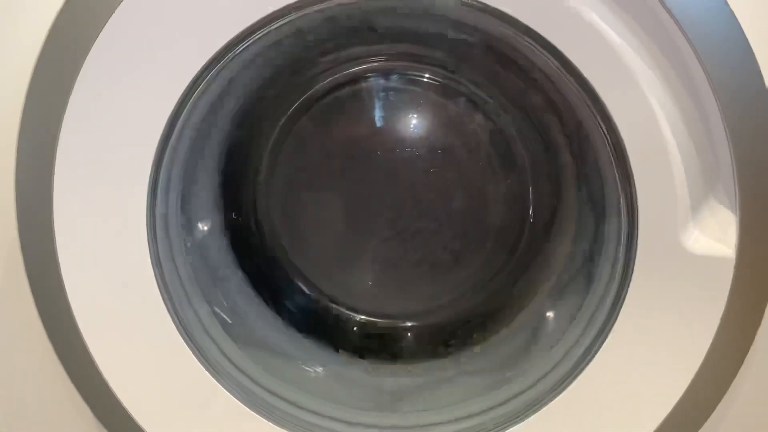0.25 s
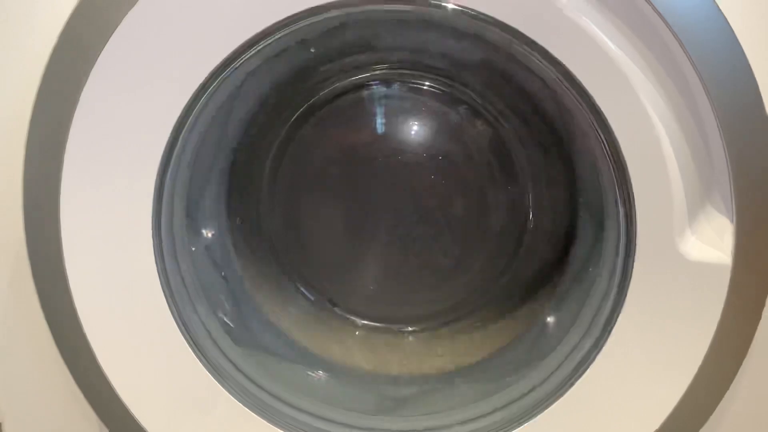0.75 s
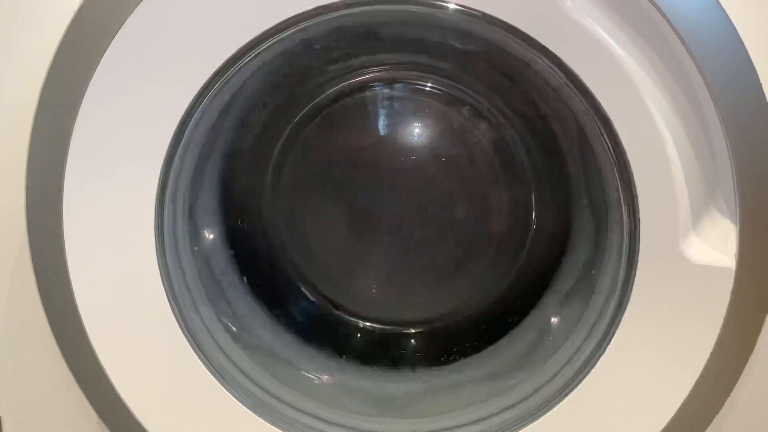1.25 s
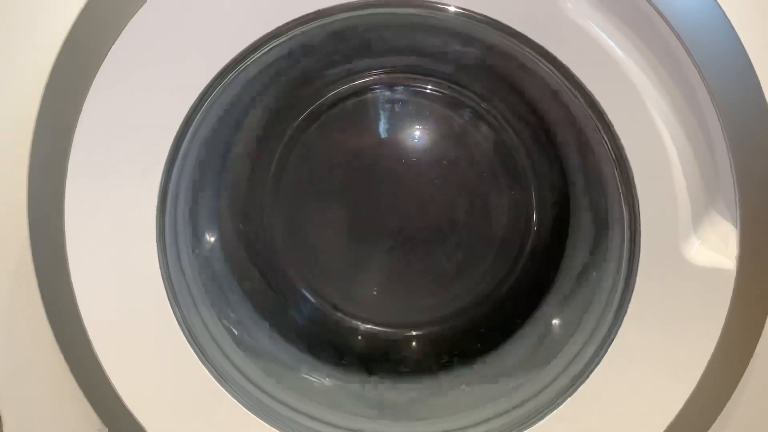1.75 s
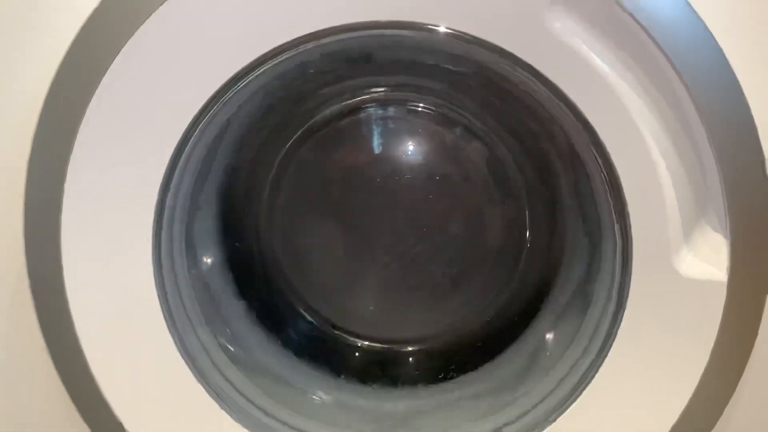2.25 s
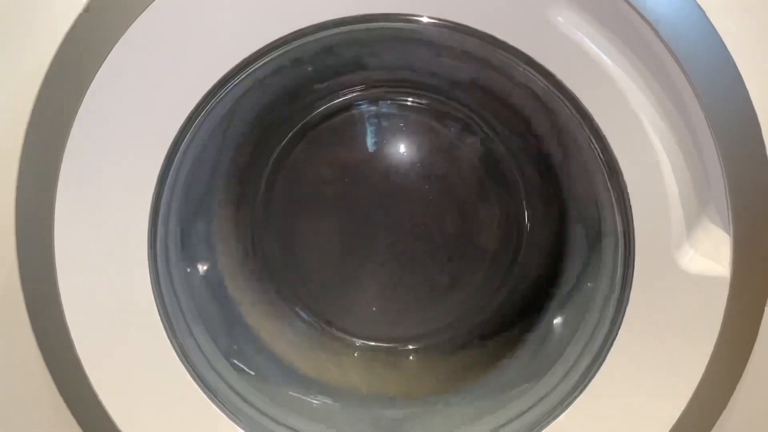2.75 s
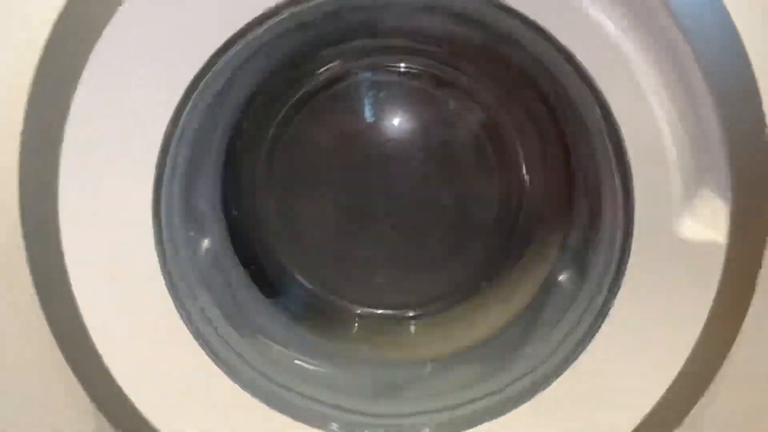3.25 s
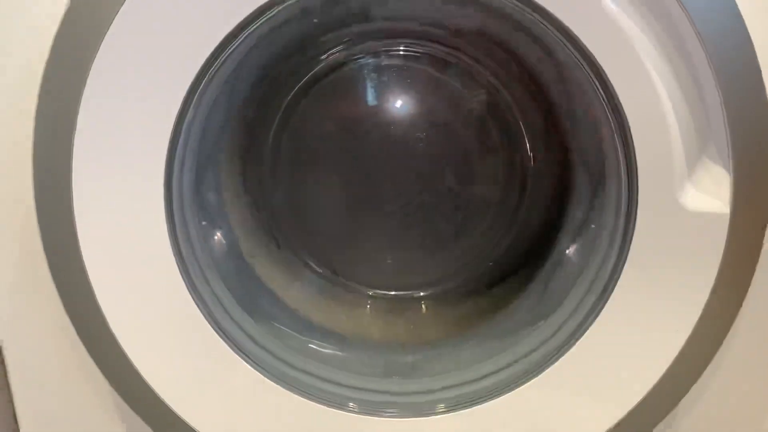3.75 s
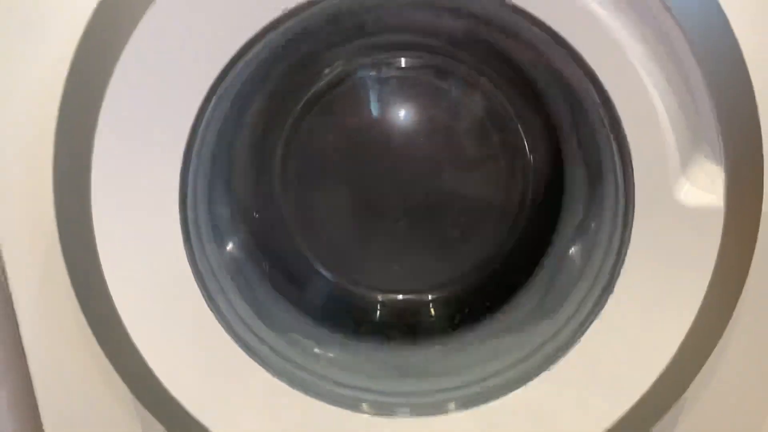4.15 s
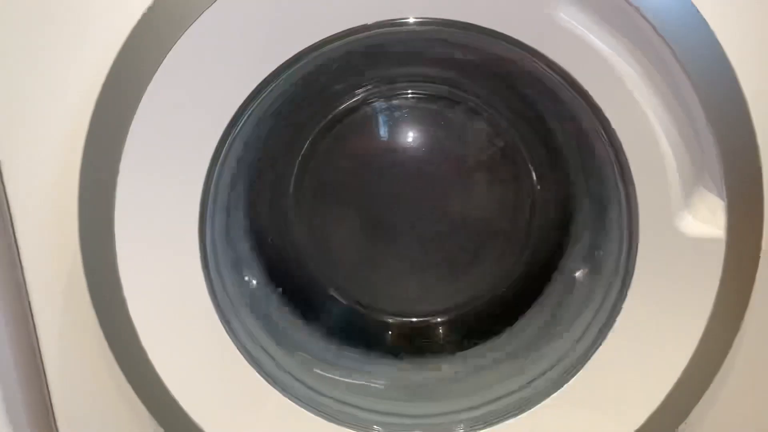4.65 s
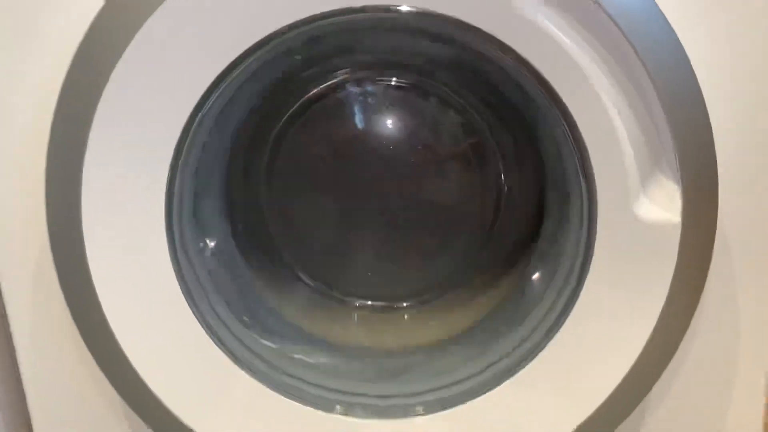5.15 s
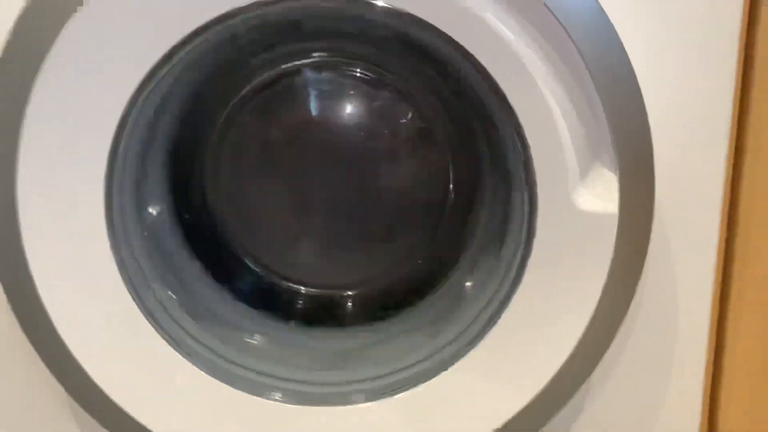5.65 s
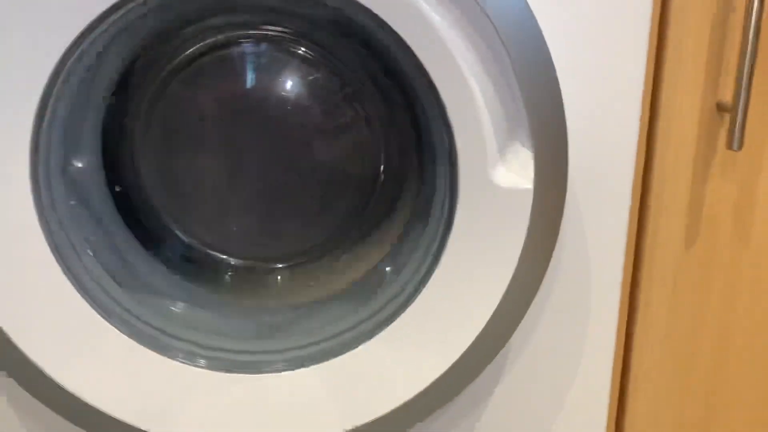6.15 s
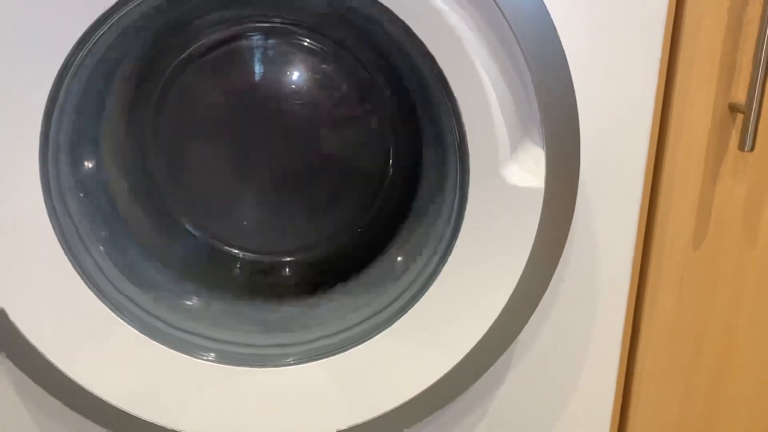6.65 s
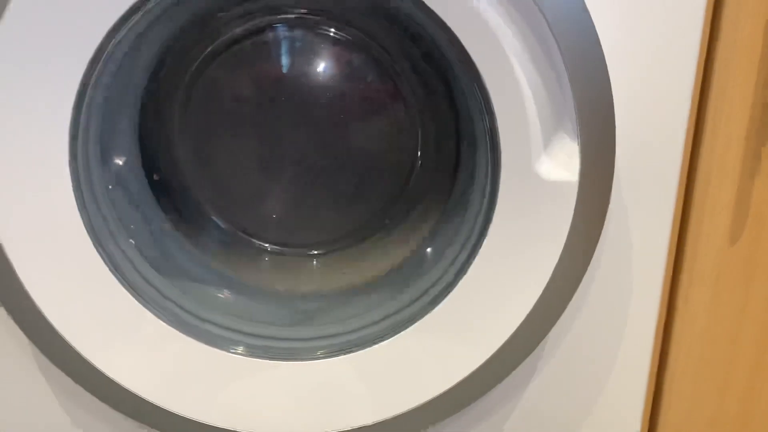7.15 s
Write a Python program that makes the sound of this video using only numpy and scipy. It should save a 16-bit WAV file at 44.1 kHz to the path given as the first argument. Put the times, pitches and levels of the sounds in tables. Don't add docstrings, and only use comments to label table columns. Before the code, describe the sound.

A front-loading washing machine spins fast with a low, slightly rising drone, rapid soft knocking and airy hiss, then one short metallic twang.

```python
import sys
import numpy as np
from scipy import signal
from scipy.fft import rfft, irfft
from scipy.io import wavfile
from scipy.ndimage import uniform_filter1d

SR = 44100
rng = np.random.default_rng(int(sys.argv[2]) if len(sys.argv) > 2 else 0)


def gain_from_db(level_db):
    decades = np.asarray(level_db, float) / 20
    return 10 ** decades


def dump(signal):
    limited = np.clip(np.atleast_2d(signal).T, -1, 1)
    pcm = np.round(limited * 32767).astype(np.int16)
    wavfile.write(sys.argv[1], SR, pcm)


N = 326340
T = np.arange(N) / SR
HZ = np.fft.rfftfreq(N, 1 / SR)
COARSE = 8
EARS = np.array([[1], [-1]])


def curve(table):
    s, *columns = np.transpose(table)
    return [np.interp(T, s, c) for c in columns]


def over_hz(table):
    hz, value = np.transpose(table)
    return np.interp(np.log(HZ + 1), np.log(hz), value)


def unit(x):
    return x / np.sqrt(np.mean(x ** 2))


def walk(rate_hz):
    hold = int(SR / COARSE / rate_hz)
    held = np.repeat(rng.standard_normal(N // COARSE // hold + 2), hold)
    smooth = uniform_filter1d(uniform_filter1d(held, hold), hold)
    return 1.3 * smooth[:len(T[::COARSE])]


def ring(hz, t60, start=0., size=SR // 2):
    t = T[:size]
    return np.sin(2 * np.pi * hz * t + start) * gain_from_db(-60 * t / t60)


# (frequency [Hz], likeness [0-1])
PORT_LIKENESS = [(60, 0.7), (200, 1), (400, 0.5), (700, 0.36), (1300, 0.39), (3000, 0), (5000, 0),
                 (6500, 0.43), (8500, 1), (11000, 0.7), (13300, 1), (15500, .9)]


def ports():
    lag_s, twist_rad = 9.1 / 44100, -1.7
    one, other = rfft(rng.standard_normal((2, N)))
    alike = np.clip(over_hz(PORT_LIKENESS), 0, 1)
    lead = 2 * np.pi * HZ * lag_s + twist_rad * np.clip(HZ / 6000, 0, 1) ** 2
    shared = alike * np.exp(1j * lead) * one
    return np.array([one, shared + np.sqrt(1 - alike ** 2) * other])


# (multiple of turn rate, level close [dB], level backed off [dB])
PANEL_MULTIPLES = [(2, -54.1, -55.5), (3, -39.3, -38.4), (4, -44.8, -43.2), (5, -37.9, -39.3),
                   (6, -28.9, -28.8), (7, -24.1, -22.4), (8, -40.9, -40.9), (9, -37.3, -42.8),
                   (10, -44.4, -44.7), (11, -46.6, -45.1), (12, -43.6, -42.1), (13, -41.3, -42.0),
                   (14, -50.4, -50.1), (15, -37.6, -39.8), (16, -47.1, -42.0), (17, -41.8, -42.1),
                   (18, -43.2, -44.9), (19, -47.6, -48.6), (20, -49.7, -45.0), (22, -46.8, -53.1),
                   (25, -53.6, -48.0), (27, -54.7, -49.4), (29, -54.2, -47.3), (33, -52.7, -56.1),
                   (34, -50.7, -55.5)]
IN_STEP_MULTIPLES = (6, 7, 11, 18)


def cabinet(turn, away):
    turn, away = turn[::COARSE], away[::COARSE]
    out = np.zeros((2, len(turn)))
    panels = {k: (close_db, far_db) for k, close_db, far_db in PANEL_MULTIPLES}
    multiples = range(2, 44 + 1)
    chance = rng.standard_normal((len(multiples), 3))
    for k, (pan, skew, loose) in zip(multiples, chance):
        faint_db = -54.5 - .32 * (k - 21) + 2.5 * np.array([skew, loose])
        close_db, far_db = panels.get(k, faint_db)
        spread = np.clip((k - 7) / 5, .07, 1)

        sweep = (k - 7) * (1.3 - .1 * (k - 6))
        sweep += np.sin(2 * np.pi * k / 3 + 3) * (k != 8)
        sweep += 3 * loose * (k > 19)
        phase = 2 * np.pi * k * turn + sweep * (k not in IN_STEP_MULTIPLES) + .2 * spread * walk(1.5)

        db = close_db + away * (far_db - close_db) + 1.2 * spread * walk(1.2)
        db += 11 * away * (1 - away) * (k == 5 or 8 <= k <= 12)
        db += 1.2 * away * (13 <= k <= 17)
        for ear, sign in enumerate((1, -1)):
            ear_db = db + 3 + sign * (.3 + spread * (.5 + .9 * pan))
            out[ear] += gain_from_db(ear_db) * np.cos(phase + sign * .2 * spread * skew)
    return signal.resample_poly(out, COARSE, 1, axis=1)[:, :N]


# (frequency [Hz], level [dB], t60 [s])
PULLEY_MODES = [(667, -9, .3), (712, -10, .25), (752, -15, .15)]


def belt(turn, lap, away):
    at = np.flatnonzero(np.diff(np.floor(lap)))
    chance = rng.standard_normal((len(at), 3)).T
    size = gain_from_db(1.2 * chance[0] + 1.2 * np.cos(2 * np.pi * turn[at] - 2.4))
    push = np.zeros((2, N + SR))
    for ear, sign in enumerate((1, -1)):
        late = (14 * chance[1] + 5 * sign * chance[2]).astype(int)
        push[ear, at + late] = size

    lead_s = .015
    t = T[:SR // 2] - lead_s
    blip = np.exp(-(t / 0.0096) ** 2) * np.sin(2 * np.pi * t * (700 + 2500 * t))
    after = sum(gain_from_db(db) * ring(hz, t60) for hz, db, t60 in PULLEY_MODES)
    after = after * np.clip(t / 0.013, 0, 1)
    skip = int(lead_s * SR)
    blip, after = (signal.fftconvolve(push, x[None])[:, skip:][:, :N] for x in (blip, after))
    knock = gain_from_db(-4 * away) * blip + gain_from_db(3 * away) * after

    null_s, null_width_s = 5.35, 1.14
    db = -41.5 - 7 * np.exp(-((T - null_s) / null_width_s) ** 2)
    db += 1.2 * 3.3 * away * (1 - away)
    db += 3.5 * np.clip((T - null_s) / 2, 0, 1)
    return unit(knock) * gain_from_db(db)


# (time [s], level [dB], frequency [Hz], t60 [s])
SLIP_EVENTS = [
    (5.360, -26, 2750, .05),
    (5.364, -27, 2650, .04),
    (5.383, -21, 2750, .025),
    (5.383, -24, 1270, .08),
]
# (frequency [Hz], level [dB], t60 [s])
SNAP_MODES = [(429, -23, 0.1), (830, -28, 0.055), (1060, -25.5, 0.075), (1225, -26, 0.18),
              (1366, -28, 0.075), (1655, -22, 0.067), (3240, -23, 0.03), (2910, -17, 0.04),
              (4680, -19, .02), (5000, -22.5, 0.019)]
# (time after the snap [s], level [dB])
CHATTER = [
    (0, 4),
    (.013, -10),
    (.028, -12),
    (.059, -7.5),
    (.080, -16),
]
# (frequency [Hz], level per Hz [dB])
ECHO_SPECTRUM = [(210, -43), (350, -14), (554, -10.5), (1310, -2.5), (4660, -13), (7150, -23), (7700, -27),
                 (8050, -99), (9760, -23), (12000, -15.5), (15600, -57), (22000, -120)]
# (frequency [Hz], width [Hz], level [dB])
SHELL_MODES = [(1220, 145, 8), (1540, 200, 4.5), (3100, 150, 2), (4770, 110, 8)]


def twang():
    snap_s = 5.403
    out, size = np.zeros((2, N)), SR // 2
    t = T[:size]
    onset = np.minimum(t / .002, 1)
    for s, db, hz, t60 in SLIP_EVENTS:
        i = int(s * SR)
        out[:, i:i + size] += gain_from_db(db) * ring(hz, t60, .3 * EARS) * onset

    turns = 1.32 * rng.standard_normal((len(SNAP_MODES), 2, 1)) * np.array([[1], [.4]])
    modes = sum(gain_from_db(db) * ring(hz, t60, start) for (hz, db, t60), start in zip(SNAP_MODES, turns))
    shell_db = sum(db / (1 + ((HZ - hz) / width) ** 4) for hz, width, db in SHELL_MODES)
    tail_db = over_hz(ECHO_SPECTRUM)
    crack, echo = (unit(irfft(ports() * gain_from_db(tail_db + db), N))[:, :size] for db in (0, shell_db))
    blow = modes * onset + gain_from_db(-24) * crack * np.exp(-t / .006)
    for late_s, db in CHATTER:
        i = int((snap_s + late_s) * SR)
        out[:, i:i + size] += gain_from_db(db) * blow

    click = unit(irfft(ports() * (HZ > 7000), N))[:, :size]
    i = int(snap_s * SR)
    out[:, i:i + size] += gain_from_db(-20.5) * click * np.exp(-t / 0.0059) * np.minimum(t / 0.0028, 1)
    out[:, i:i + size] += gain_from_db(-19.5) * echo * gain_from_db(-60 * t / 0.51) * (1 - np.exp(-t / 0.0022))
    return out


# (frequency [Hz], level per Hz [dB])
RUMBLE_SPECTRUM = [(20, -18), (35, -18), (55, -13), (85, 2.5), (130, -8), (220, -8), (350, -9),
                   (500, -12.5), (800, -10.5), (1200, -39.5)]


def rumble():
    return unit(irfft(ports() * gain_from_db(over_hz(RUMBLE_SPECTRUM)), N)) * gain_from_db(-37.5)


# (frequency [Hz], level per Hz [dB])
HISS_SPECTRUM = [(300, -51), (500, -9.5), (620, -15.5), (800, -12.5), (1200, -7.5), (1600, -14),
                 (2200, -19), (3500, -24), (5500, -29.5), (7700, -29.5), (9500, -24.5), (12000, -28),
                 (13300, -30), (14800, -30.5), (16500, -40)]
# (frequency [Hz], width [Hz], level close [dB], level backed off [dB])
STANDING_WAVES = [(705, 31.4, 13, 12), (1738, 31, 7, -0.5), (2220, 36, 9, 3.5), (2680, 460, 1, -1),
                  (1220, 130, 0, 1.5), (3908, 58, 1, 10.5), (4690, 250, 2, 5)]


def whirr_and_hiss(turn, lap, away):
    noise = ports() * gain_from_db(over_hz(HISS_SPECTRUM))
    close_db, far_db = (sum(row[j] / (1 + ((HZ - row[0]) / row[1]) ** 4) for row in STANDING_WAVES)
                        for j in (2, 3))
    whirr_db = 0.6 * away + 1.5 * 4 * away * (1 - away)
    hiss_db = -0.3 * away
    bands = np.zeros((2, N))
    for hz in 500 * 2 ** np.arange(0, 5.3, .5):
        octaves = np.clip(np.log2((HZ + 1) / hz), -.5, .5)
        band = noise * np.cos(np.pi * octaves) ** 2
        near, distant = (irfft(band * gain_from_db(db), N) for db in (close_db, far_db))
        high = np.clip(np.log2(hz / 1400), 0, 1)
        db = (1 - high) * (whirr_db - whirr_db.mean()) + high * (hiss_db - hiss_db.mean())
        db += np.repeat(walk(9), COARSE)[:N]
        db += 1.5 * (1 - 0.65 * high) * np.cos(2 * np.pi * turn - 2.1)
        db += 0.81 * (hz > 7000) * np.cos(2 * np.pi * lap)
        lean = gain_from_db(2.35 * away * (800 < hz < 1600) * EARS)
        bands += lean * gain_from_db(db) * (near + away * (distant - near))
    return unit(bands) * gain_from_db(-35 + .3 * EARS)


# (frequency [Hz], level [dB])
HUM_TONES = [(58, -56), (100, -44), (400, -56)]


def hum():
    return sum(gain_from_db(db + 2.5) * np.sin(2 * np.pi * hz * T) for hz, db in HUM_TONES)


# (time [s], backed off [0-1])
PHONE_PATH = [
    (0, 0),
    (2, 0.03),
    (3, 0.54),
    (4, 0.81),
    (5.5, 0.91),
    (7.4, 1),
]


def scene():
    start_turn, spin_hz, spin_up_hz_per_s = .056, 14.861, .0491
    turn = start_turn + spin_hz * T + spin_up_hz_per_s * T ** 2 / 2
    lap = .7281 * (turn - start_turn) + .585
    away = np.clip(curve(PHONE_PATH)[0], 0, 1)
    washer = cabinet(turn, away) + belt(turn, lap, away) + twang()
    return washer + rumble() + whirr_and_hiss(turn, lap, away) + hum()


def roll_off(x):
    return signal.sosfilt(signal.butter(12, 17110, fs=SR, output="sos"), x)


def record(dry):
    top_hz = 15750
    dull = irfft(rfft(dry) * (HZ < top_hz), N)
    return roll_off(dull)


dry = scene()
out = record(dry)
dump(out)
```